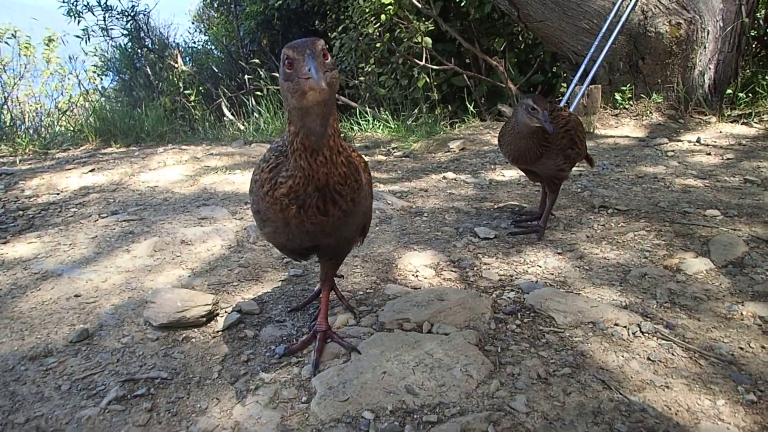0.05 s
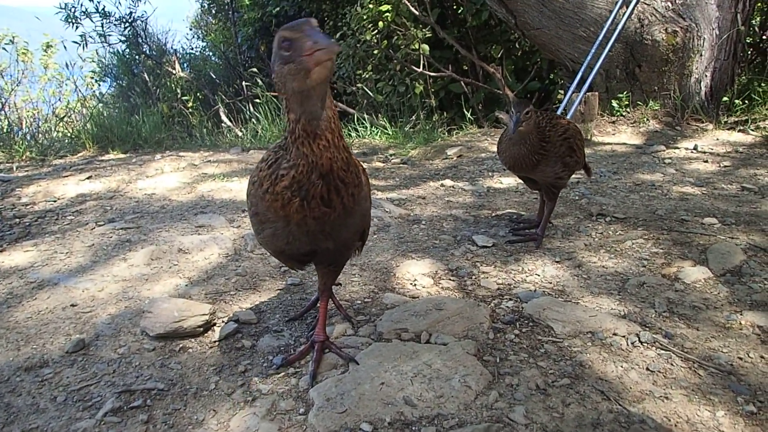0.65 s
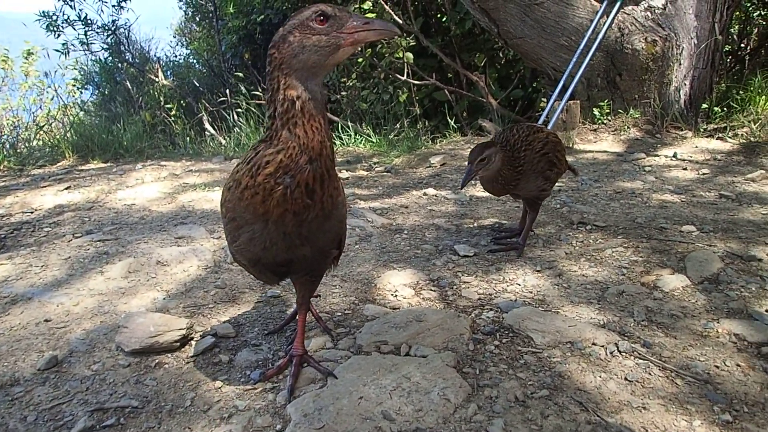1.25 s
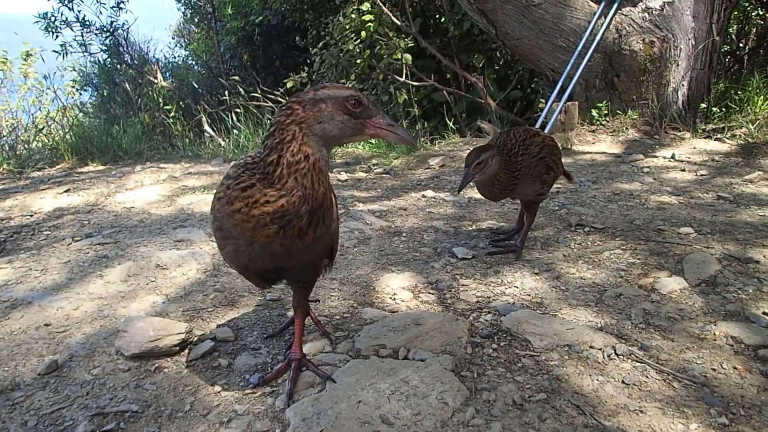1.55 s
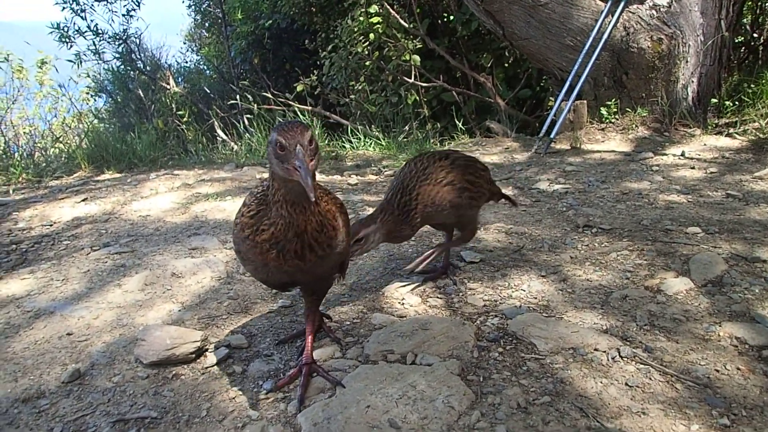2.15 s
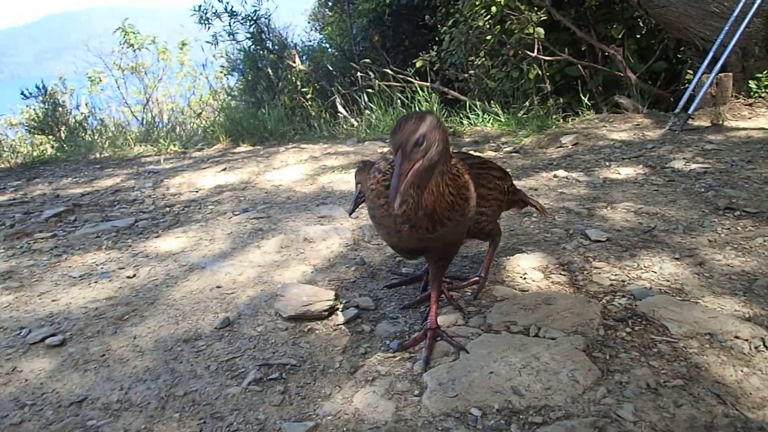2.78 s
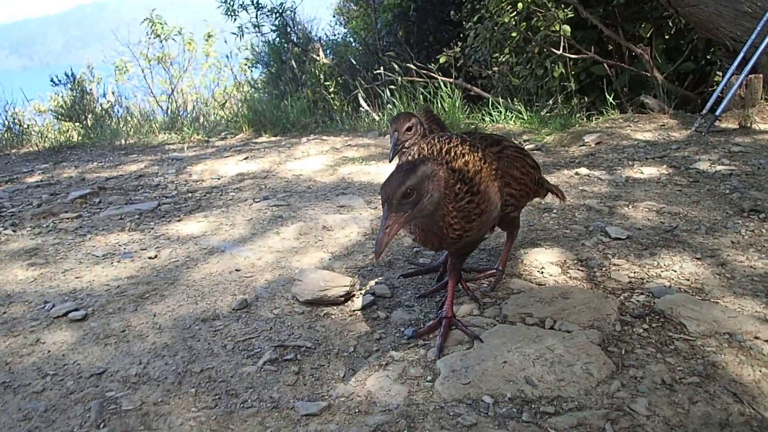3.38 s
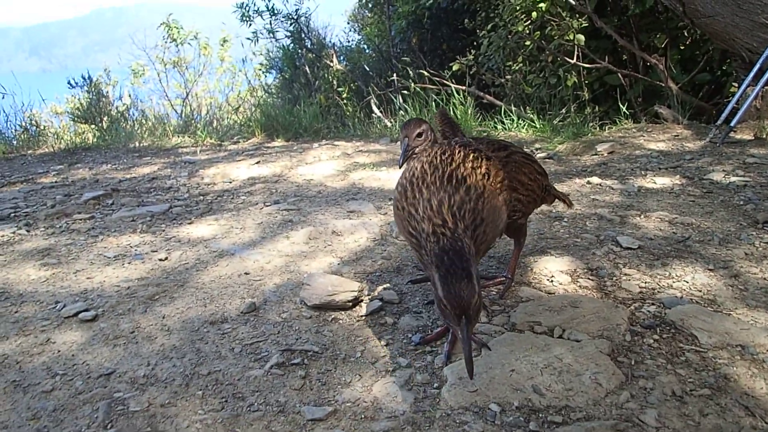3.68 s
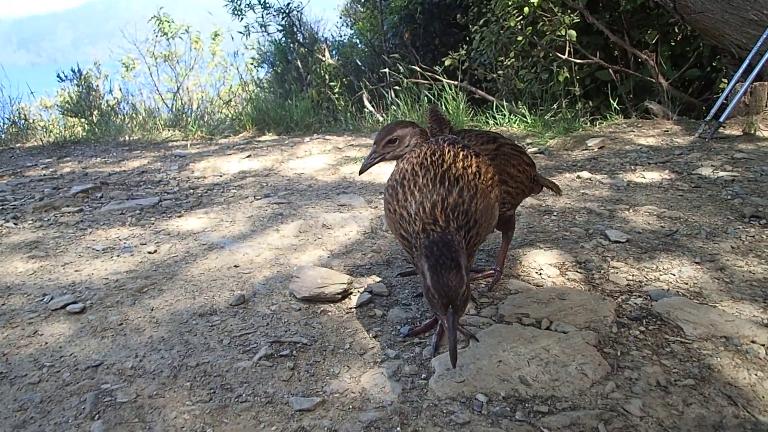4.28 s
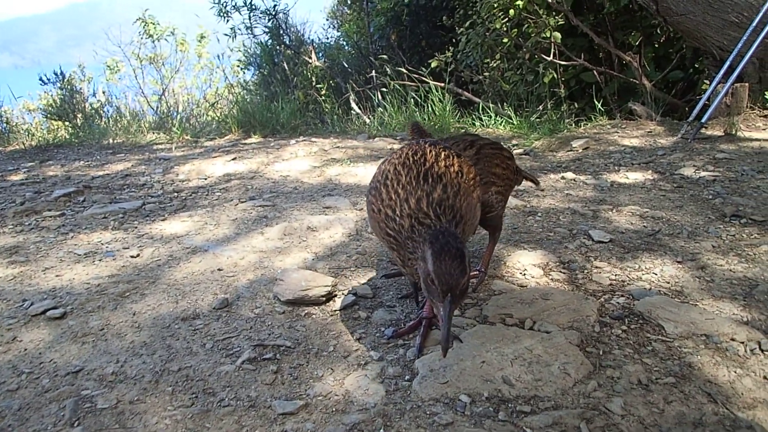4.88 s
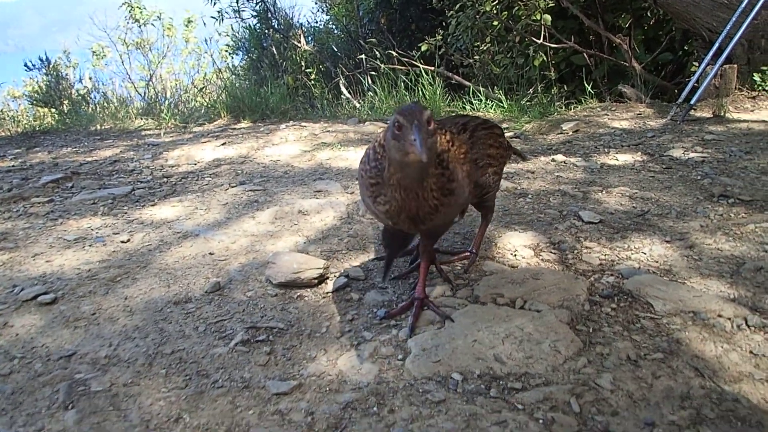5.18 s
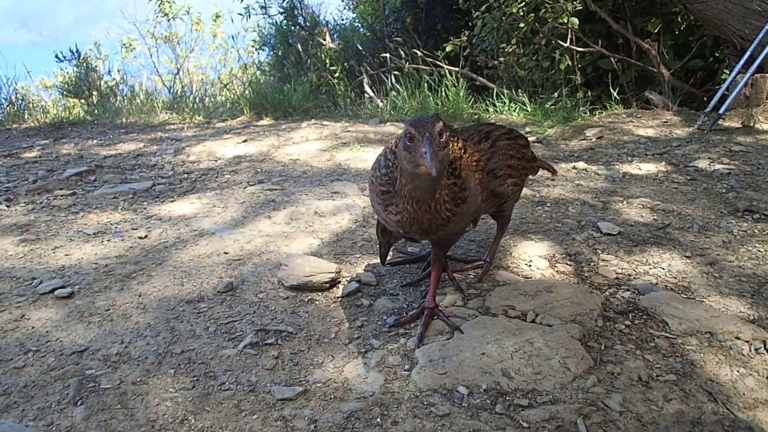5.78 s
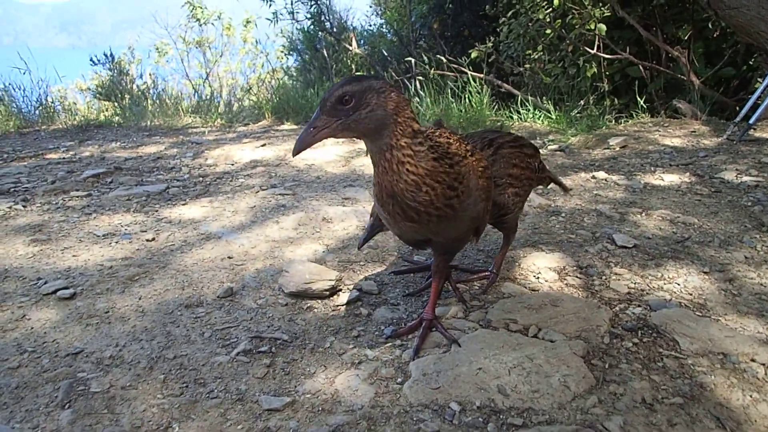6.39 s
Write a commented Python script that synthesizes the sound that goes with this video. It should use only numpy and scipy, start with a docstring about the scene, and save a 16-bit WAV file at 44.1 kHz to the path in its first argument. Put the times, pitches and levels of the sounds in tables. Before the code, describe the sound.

Birds peck stony ground close by with sharp, gritty taps while a small songbird warbles high and fast in the bushes.

```python
"""Stony ground beside bushes, in the open air. Two ground birds forage right by the microphone.
Each sharp tap is a dull thump with a burst of cracking grit; lighter clicks, pats and scuffs fall
between. Behind them a small songbird warbles in the bushes, a two-voiced whistle swinging up and down.
A far bird whistles faintly over a soft hush, and a light breeze rumbles on the microphone."""
import sys
import numpy as np
from scipy import signal
from scipy.fft import rfft, irfft
from scipy.io import wavfile
from scipy.ndimage import uniform_filter1d

SR = 44100
rng = np.random.default_rng(int(sys.argv[2]) if len(sys.argv) > 2 else 0)


def dump_mix(stems):
    """Bounce the given channels to the path in sys.argv[1] as a 16-bit WAV at rate SR."""
    frames = np.atleast_2d(stems).T  # one column per channel
    limited = np.clip(frames, -1, 1)  # hard clip at full scale
    pcm = np.round(limited * 32767).astype(np.int16)
    wavfile.write(sys.argv[1], SR, pcm)


N = 292824
TIME = np.arange(N) / SR
HZ = np.fft.rfftfreq(N, 1 / SR)

# Close taps, graze and last knock relative to the main crack: start_s, knock_db, knock_hz, snap_db,
# graze_db, rebound_hz, rebound_gap_s, rebound_fall_db_per_s, last_delay_s, last_db
TAPS = [(0.4404, -15.5, 1610, -20, -40, 762, .0047, 332, 0.07, -9),
        (1.3375, -17, 1575, -19, -30, 720, 0.0038, 280, 0.075, -26),
        (2.201, -15, 1135, -14, -34, 954, 0.0054, 567, 0.058, -20.5),
        (2.842, -17.5, 1270, -16.5, -3, 2240, .0029, 802, 0.074, -12),
        (3.8233, -21.5, 2160, -17, -30, 2110, .005, 406, 0.068, -7.5),
        (5.028, -19, 1057, -20.5, 1, 830, 0.0071, 1000, .0395, -14),
        (5.619, -16, 1144, -14, -10.5, 935, 0.0054, 634, 0.025, -36),
        (6.6235, -16, 1198, -15, -16.5, 1150, .0043, 650, .05, -11)]
# Dull thumps, one under each tap plus two lone low bumps, judder relative to the thump:
# peak_s, level_db, pitch_hz, judder_db
DULL_THUMPS = [(0.4409, -19, 204, -9), (1.3359, -19, 224, -4), (2.2004, -21, 216, -5),
               (2.8425, -19, 210, -10), (3.8215, -18.5, 212, -4), (5.0288, -22, 219, -4),
               (5.6194, -22, 191, -5), (6.2944, -25, 104, -25), (6.333, -20, 95, -35),
               (6.6239, -21, 196, -12)]
# Feet scuffing the soil, and at 6.155 s a rustle of feathers: start_s, length_s, level_db
SCUFFS = [(0.45, 0.02, -29), (1.327, 0.073, -37), (2.189, 0.11, -46), (2.778, 0.061, -47),
          (2.838, 0.077, -44.5), (3.312, 0.022, -50), (3.814, 0.044, -29), (4.366, 0.045, -44.5),
          (5.025, 0.11, -40), (5.266, 0.033, -41), (5.625, 0.059, -59), (5.674, 0.025, -44),
          (5.911, 0.1, -52), (6.155, 0.051, -47.5)]
# Light contacts: start_s, level_db
STONE_CLICKS = [(3.1078, -20.5), (3.181, -21), (3.184, -23.5), (3.966, -28.5), (4.129, -40.5), (4.801, -40),
                (5.394, -35.5), (5.8755, -40.5), (5.8944, -27), (5.915, -34.5), (5.958, -40.5)]  # claws and bills on stone
TOE_PATS = [(2.776, -36), (3.077, -35.5), (3.0882, -37), (3.0985, -39), (3.11, -31), (3.124, -37),
            (3.186, -32), (3.273, -46), (3.364, -41.5), (4.934, -58), (4.966, -53), (5.276, -41),
            (5.929, -39), (5.956, -36), (5.97, -40), (6.133, -35.5), (6.151, -33.5)]  # soft footfalls
# Spectra of the close ground sounds: frequency_hz, gain_db
KNOCK_SPECTRUM = [(100, -7), (300, -7), (480, -16.5), (750, 2), (1100, 8), (1600, 1), (2300, -5),
                  (3100, -2.5), (3800, -19), (5000, -17), (9000, -66)]
SNAP_SPECTRUM = [(2500, -87), (3800, -42), (4600, -4.5), (5300, 2), (6300, -1), (7200, -7), (8200, -7),
                 (9500, -19), (12000, -30), (16000, -27)]
JUDDER_SPECTRUM = [(50, -36), (110, -17.5), (160, 2.5), (230, 4), (300, -4.5), (450, -18.5), (900, -56.5)]
GRIT_SPECTRUM = [(80, 8), (250, -2.5), (600, 1.5), (1200, -2), (2300, -12), (3700, -15.5), (5400, -2.5),
                 (8000, -6.5), (10000, -40), (16000, -63)]
CLAW_SPECTRUM = [(100, -10), (400, -9.5), (900, -9.5), (1600, -12), (2800, -14), (3700, -7.5), (4600, 2),
                 (5400, -0.5), (7500, -6), (9500, -18.5), (16000, -51)]
TOE_SPECTRUM = [(40, -15), (100, 5), (220, 0), (450, -6), (800, -13), (1500, -38), (3000, -28)]

# Song in the bushes, one swing up and down a row: start_s, rise_s, fall_s, aimed_crest_hz,
# aimed_end_hz, drop_lateness (1 = even), rise_db, fall_db, accent_db
SONG_SYLLABLES = [(0.007, 0.0083, 0.031, 5450, 4700, 0.48, -46, -32, 6),
                  (0.038, 0.018, 0.029, 6580, 3960, 0.89, -35, -35, -0.5),
                  (0.129, 0.02, 0.068, 6860, 3940, 1.15, -43.5, -48, 0),
                  (0.234, 0.028, 0.049, 7330, 4760, 0.68, -28.5, -27, -3.5),
                  (0.312, 0.0264, 0.045, 7100, 5472, 0.6, -25.5, -21.5, -20),
                  (0.392, 0.027, 0.054, 6770, 4050, 0.82, -27.5, -18.5, -3),
                  (0.474, 0.038, 0.05, 6900, 3960, 0.79, -26.5, -21, -8.5),
                  (0.558, 0.042, 0.055, 6830, 3980, 1.1, -26, -22.5, -10),
                  (0.658, 0.051, 0.05, 7040, 3942, 0.76, -28, -21.5, -8.5),
                  (0.768, 0.043, 0.047, 6940, 4030, 0.92, -30, -22.5, -5.5),
                  (0.866, 0.043, 0.045, 6680, 3930, 0.92, -28, -20.5, -12),
                  (0.979, 0.027, 0.04, 7000, 3906, 1.0, -25.5, -25.5, 2.5),
                  (1.441, 0.0025, 0.026, 4940, 4670, 1.345, -31, -25, -2.5),
                  (1.466, 0.025, 0.026, 5520, 3922, 1.4, -27, -37, 5),
                  (1.559, 0.02, 0.053, 7160, 4430, 0.83, -32, -34, 5),
                  (1.634, 0.016, 0.063, 6880, 4062, 1.6, -26.5, -29, 3.5),
                  (1.711, 0.043, 0.044, 7580, 5130, 0.9, -30.5, -23, -8),
                  (1.803, 0.019, 0.058, 7000, 4466, 1.4, -25, -25, -0.5),
                  (1.88, 0.027, 0.046, 6970, 6213, 0.61, -22, -19.5, -1),
                  (1.959, 0.029, 0.044, 7150, 4662, 0.83, -26, -25, -4),
                  (2.034, 0.013, 0.051, 6040, 5470, 1.54, -22, -22.5, -3),
                  (2.113, 0.016, 0.044, 5860, 4782, 0.93, -30, -29.5, 8.5),
                  (2.174, 0.037, 0.045, 5590, 4105, 2.1, -38, -29.5, 6.5),
                  (2.279, 0.025, 0.029, 7000, 4130, 0.6, -27, -26, 8),
                  (2.363, 0.024, 0.022, 6710, 4060, 0.72, -31, -23, 9),
                  (2.446, 0.019, 0.032, 6560, 3763, 0.52, -29, -22.5, 1.5),
                  (2.53, 0.02293, 0.029, 7450, 3790, 0.8, -25, -20.5, -6),
                  (2.646, 0.017, 0.041, 5920, 3785, 0.86, -25, -28, 6.5),
                  (2.733, 0.022, 0.031, 7280, 3924, 0.7, -24.5, -23, -2.5),
                  (3.151, 0.003, 0.021, 5900, 5430, 0.954, -37, -30, -1),
                  (3.175, 0.025, 0.041, 6100, 3950, 1.55, -29, -45, 7),
                  (3.271, 0.015, 0.053, 7550, 5707, 0.59, -29.5, -32, 7),
                  (3.337, 0.024, 0.06, 6380, 4557, 2.1, -38.5, -37.5, 2.5),
                  (3.421, 0.029, 0.047, 7400, 5326, 0.5, -26.5, -29, -3),
                  (3.502, 0.023, 0.054, 7520, 4280, 0.5, -29, -31.5, 8.5),
                  (3.57, 0.045, 0.044, 7450, 4584, 0.58, -23, -33.5, 5),
                  (3.657, 0.046, 0.038, 7270, 3947, 0.74, -28.5, -24.5, 2),
                  (3.762, 0.028, 0.038, 7690, 3994, 0.84, -23.5, -29.5, 4),
                  (3.867, 0.025, 0.043, 7580, 3830, 0.5, -27, -24, 4),
                  (3.958, 0.026, 0.034, 7530, 3827, 1.07, -26, -28.5, 2.5),
                  (4.482, 0.00714, 0.02, 6080, 4845, 0.66, -35, -24.5, 2),
                  (4.509, 0.0298, 0.035, 6240, 3988, 1.3, -29, -50.5, 9),
                  (4.605, 0.017, 0.05, 7430, 5770, 0.8, -30, -36.5, 10),
                  (4.683, 0.024, 0.03, 7000, 5420, 0.93, -36, -27.5, 12),
                  (4.736, 0.053, 0.021, 7180, 5273, 0.83, -45.5, -25, 14),
                  (4.81, 0.031, 0.053, 7450, 5310, 0.9, -37, -32.5, 15.5),
                  (4.902, 0.034, 0.043, 7400, 5044, 0.45, -23.5, -18.5, -1.5),
                  (4.978, 0.028, 0.042, 7300, 3930, 0.7, -26, -30.5, -1),
                  (5.067, 0.028, 0.041, 7540, 3915, 1.2, -25, -24.5, -5),
                  (5.162, 0.025, 0.036, 7700, 3940, 1.03, -22.5, -19, -6.5),
                  (5.255, 0.028, 0.032, 7600, 3904, 0.72, -24, -22.5, -1.5),
                  (5.343, 0.028, 0.032, 7230, 3890, 0.9, -26.5, -21.5, 4),
                  (5.432, 0.026, 0.031, 6800, 3970, 1.5, -26.5, -24, 7),
                  (5.537, 0.016, 0.035, 6860, 4005, 2.4, -27.5, -21, 8.5),
                  (6.025, 0.00253, 0.03, 6630, 5040, 1, -36, -37, 1),
                  (6.058, 0.021, 0.038, 6060, 3950, 0.98, -34.5, -51.5, 2),
                  (6.155, 0.0068, 0.05, 6800, 5810, 2.4, -35.5, -33, -4),
                  (6.221, 0.029, 0.053, 7180, 5390, 2.2, -41, -26.5, -7),
                  (6.314, 0.03, 0.04, 6500, 3994, 1.3, -29, -25.5, -3),
                  (6.4, 0.035, 0.031, 6740, 4034, 1.2, -25.5, -23, -7.5),
                  (6.496, 0.019, 0.037, 6610, 3985, 1.1, -29.5, -21, -9.5),
                  (6.583, 0.023, 0.032, 6800, 3980, 2.2, -28, -21, -19)]
# The song sounds loudest near 5 kHz, fainter on low and high notes: pitch_hz, gain_db
LEVEL_BY_PITCH = [(3700, -14.5), (4100, -14.5), (4500, -3.5), (5100, 1.9), (5600, 0), (6000, -1.6),
                  (6500, -8), (7200, -8.5)]
# Strength of the song's other tones against its fundamental: pitch_hz, gain_db
SECOND_VOICE_LEVEL = [(4600, -9), (5400, -20), (6000, -7.5), (7000, -10)]  # just above the first voice
OCTAVE_LEVEL = [(3900, 2), (4300, -16.5), (4900, -27), (5600, -22), (6300, -24), (7200, -18)]  # grows on low notes
# Notes of the distant bird: start_s, length_s, pitch_hz, level_db
FAR_NOTES = [(5.36, 0.081, 1800, -60), (6.102, 0.2, 1758, -63.5), (6.361, 0.16, 1738, -61.5)]

# Breeze on the microphone: time_s, level_db
GUSTS = [(0.0, -62), (1.14, -70), (1.33, -39.5), (1.48, -60), (4.84, -55.5), (4.94, -37), (5.38, -58.5),
         (5.97, -37.5), (6.19, -51), (6.31, -41), (6.51, -59), (6.64, -61)]
# Midrange swells in the hush: start_s, length_s, level_db
HUSH_SWELLS = [(0.135, 0.27, -49.5), (0.699, .2, -50), (1.85, 0.25, -51.5), (2.48, .18, -50.5)]
# Spectra of the background: frequency_hz, gain_db
RUMBLE_SPECTRUM = [(20, -19.5), (45, -5.5), (75, -5.5), (120, -11.5), (200, -22), (500, -47)]
HUSH_SPECTRUM = [(30, -16.5), (70, -8.5), (200, -10), (400, -12), (800, -17), (1350, -19), (2000, -28.5),
                 (3700, -35.5), (4500, -29), (5400, -22), (8000, -20.5), (9500, -27), (12300, -20),
                 (16000, -26.5)]
SWELL_SPECTRUM = [(200, -4), (500, -5.5), (1150, 0), (1800, -11), (2800, -15), (4000, -14), (8000, -38)]
# How alike the hush is on the left and right: frequency_hz, correlation
HUSH_LIKENESS = [(60, 0.66), (250, 0.4), (1400, 0.15), (3100, 0.67), (6000, 0.037), (15000, 0.22)]
# Balance of the microphone's two sides: frequency_hz, left_minus_right_db
MIC_BALANCE = [(60, 3.5), (300, 3), (2000, 2), (4500, 2.5), (8000, -0.5), (15000, 2)]


def taps(uneven_db=1.5, uneven_pitch=0.09, uneven_gap=0.1, rebounds=7, last_knock_hz=970):
    """Right by the microphone, each tap grazes, cracks, chatters in fading rebounds and knocks last."""
    out = np.zeros(N)
    graze_lead_s, rebound_knock_db, rebound_snap_db, last_snap_db = 0.0034, -3, -4, -6
    for s, knock_db, hz, snap_db, graze_db, rebound_hz, gap_s, fall_db_per_s, last_s, last_db in TAPS:
        add(out, s - graze_lead_s, grit_crack(knock_db + graze_db, hz, snap_db + graze_db))
        add(out, s, grit_crack(knock_db, hz, snap_db))
        jitter = rng.uniform(-1, 1, (rebounds, 4)) * np.sqrt(3)
        for k, (time_jitter, knock_jitter, pitch_jitter, snap_jitter) in enumerate(jitter, 1):
            after_s = gap_s * (k + uneven_gap * time_jitter)
            fall_db = fall_db_per_s * after_s
            knock = knock_db + rebound_knock_db - fall_db + uneven_db * knock_jitter
            snap = snap_db + rebound_snap_db - fall_db + uneven_db * snap_jitter
            add(out, s + after_s, grit_crack(knock, rebound_hz * np.exp(uneven_pitch * pitch_jitter), snap))
        last = grit_crack(knock_db + last_db, last_knock_hz, snap_db + last_db + last_snap_db)
        add(out, s + last_s, last)
    return out


def grit_crack(knock_db, knock_hz, snap_db):
    """One crack knocks the ground with its own hollow pitch and snaps brightly."""
    knock = crack(KNOCK_SPECTRUM, crush_s=0.0012, crush=0.2, ring_s=0.005, ring=0.025)
    snap = crack(SNAP_SPECTRUM, crush_s=0.00044, crush=0.52, ring_s=0.0047, ring=0.043)
    body = gain_of(-4) * knock + gain_of(-5.5) * hollow(knock_hz, t60=0.025)
    return gain_of(knock_db) * body + gain_of(snap_db - 0.5) * snap


def crack(spectrum, crush_s, crush, ring_s, ring):
    """One grain gives way: a sharp impulse, a moment of crushing and a weak ring."""
    t = np.arange(SR // 25) / SR
    force = rng.standard_normal(len(t)) * (crush * np.exp(-t / crush_s) + ring * np.exp(-t / ring_s))
    force[0] -= 1
    return unit_attack(coloured(force, spectrum))


def hollow(hz, t60):
    """Knocked ground rings briefly at one pitch."""
    t = np.arange(SR // 25) / SR
    return unit_attack(-np.sin(2 * np.pi * hz * t) * gain_of(-60 * t / t60))


def thumps(push_s=0.0033, judder_s=0.058):
    """Close, dull thumps and bumps: a push of about two swings, then a low judder as grit gives way."""
    out, t = np.zeros(N), np.arange(-SR // 40, SR // 8) / SR
    judder_onset = np.clip(t / push_s - 1, 0, 1)
    judder_decay = gain_of(-7 * ((t / judder_s) ** 2 + t / judder_s))
    for s, db, hz, judder_db in DULL_THUMPS:
        push = -np.cos(2 * np.pi * hz * t) * np.exp(-(t / push_s) ** 2 * hz / 400)
        shake = unit_rms(coloured(rng.standard_normal(len(t)), JUDDER_SPECTRUM))
        judder = gain_of(judder_db) * shake * judder_onset * judder_decay
        add(out, s + t[0], gain_of(db) * (push + judder))
    return out


def scuffs(grains_per_s=900):
    """Loose grit shifts underfoot, and once feathers rustle, in a shower of tiny grains."""
    out = np.zeros(N)
    for s, length_s, db in SCUFFS:
        chance, sign = rng.random((2, int(length_s * SR)))
        grains = (chance < grains_per_s / SR) * np.sign(sign - 0.5)
        shower = unit_rms(coloured(grains, GRIT_SPECTRUM))
        add(out, s, gain_of(db) * shower * signal.windows.tukey(len(shower), 0.5))
    return out


def clicks_and_pats():
    """Close by, claws and bills click on stone and toes pat the soil."""
    out = np.zeros(N)
    for s, db in STONE_CLICKS:
        click = crack(CLAW_SPECTRUM, crush_s=0.0013, crush=0.31, ring_s=0.0032, ring=0.02)
        add(out, s, gain_of(db) * click)
    for s, db in TOE_PATS:
        pat = crack(TOE_SPECTRUM, crush_s=0.0053, crush=0.12, ring_s=0.0076, ring=0.023)
        add(out, s, gain_of(db) * pat)
    return out


def songbird(waver=0.0085, flutter_db=2.5, rasp_rising=0.056, rasp_falling=0.022,
             second_above_hz=550, second_falling_db=-9):
    """In the bushes, a two-voiced whistle swings about eleven times a second, raspier on the way up."""
    pitch, loudness = melody()
    phase = 2 * np.pi * np.cumsum(pitch * (1 + waver * wander(hz=159))) / SR
    rising = uniform_filter1d((np.gradient(pitch) > 0) * 1., size=400)
    level = loudness * gain_of(flutter_db * wander(hz=165))
    rasp_depth = rasp_falling + (rasp_rising - rasp_falling) * rising
    rasp = rasp_depth * (wander(hz=650) * np.sin(phase) + wander(hz=650) * np.cos(phase)) / np.sqrt(2)
    beat_phase = 2 * np.pi * np.cumsum(second_above_hz * (1 + 0.28 * wander(hz=39.4))) / SR
    second_db = lookup(SECOND_VOICE_LEVEL, pitch) + second_falling_db * (1 - rising)
    second_voice = gain_of(second_db) * np.sin(phase + beat_phase)
    octave_db = lookup(OCTAVE_LEVEL, pitch) + 3 * wander(hz=61)
    overtones = gain_of(octave_db) * (np.sin(2 * phase) + gain_of(-14) * np.sin(3 * phase))
    voice = np.sqrt(2) * level * (np.sin(phase) + second_voice + rasp + overtones)
    # echoes from nearby ground beat against the gliding note; the bushes add a faint tail
    ground = gain_of(-10.5) * scatter(voice, t60=0.041, delay_s=0.003, likeness=0.51)
    bushes = gain_of(-23.5) * scatter(voice, t60=0.17, delay_s=0.032, likeness=0.19)
    return gain_of(-2) * placed(voice, lag_ms=0.014, left_db=-2) + ground + bushes


def melody(onset_hz=5100., slur_s=0.008, attack_s=0.0016, release_s=0.011, curl_hz=219.9, curl_s=0.032):
    """Pitch and loudness of the song: each syllable swings to its crest, drops and dies away."""
    hz, gate, accent = np.full(N, onset_hz), np.zeros(N), np.zeros(N)
    efforts, last_end = [], -1
    for start, rise, fall, crest_hz, end_hz, lateness, rise_db, fall_db, accent_db in SONG_SYLLABLES:
        at = max(round(start * SR), 1)
        t = TIME[:min(SR // 4, N - at)]
        span = slice(at, at + len(t))
        slurred = start - last_end < slur_s
        from_hz = hz[at - 1] if slurred else onset_hz
        climb = (crest_hz - from_hz) * ease(t / rise, lateness=1.27)
        drop = (end_hz - crest_hz) * ease((t - rise) / fall, lateness)
        curl = curl_hz * ease((t - rise - fall) / curl_s, lateness=1.8)  # a dying note curls back up
        hz[span] = from_hz + climb + drop + curl
        attack = 1 if slurred else ease(t / attack_s, lateness=1)
        gate[span] = attack * np.exp(-np.maximum(t - rise - fall, 0) / release_s)
        accent[span] = accent_db * (t > rise)
        efforts += [(start + rise / 2, rise_db), (start + rise + fall / 2, fall_db)]
        last_end = start + rise + fall
    hz = bend(hz, centre_hz=5984, width_hz=1770, push=-0.52)  # glides linger near the easiest pitch
    hz = bend(hz, centre_hz=4440, width_hz=370, push=1.29)  # and rush through a break in the voice
    flare_db = accent * np.exp(-((hz - 5100) / 580) ** 2)  # the accent acts on the fall through 5100 Hz
    effort_db = np.interp(TIME, *np.transpose(efforts))
    pitch_gain_db = uniform_filter1d(flare_db + lookup(LEVEL_BY_PITCH, hz), size=100)
    return hz, uniform_filter1d(gate, size=30) * gain_of(effort_db + pitch_gain_db)


def far_bird():
    """Far off, faint level whistles, soft at both ends, trail away in echoes."""
    out = np.zeros(N)
    for s, length_s, hz, db in FAR_NOTES:
        t = np.arange(int(length_s * SR)) / SR
        add(out, s, gain_of(db) * np.sin(2 * np.pi * hz * t) * signal.windows.tukey(len(t), 0.4))
    return out + gain_of(-2) * scatter(out, t60=0.68, delay_s=0.01, likeness=0.3)


def breeze():
    """Light gusts buffet each side of the microphone with a low rumble."""
    return gain_of(np.interp(TIME, *np.transpose(GUSTS))) * stereo_noise(RUMBLE_SPECTRUM, likeness=0.28)


def hush():
    """All around, a steady hush whose midrange swells softly now and then."""
    steady = gain_of(-48.5) * stereo_noise(HUSH_SPECTRUM, lookup(HUSH_LIKENESS, HZ))
    swell = np.zeros(N)
    for s, length_s, db in HUSH_SWELLS:
        add(swell, s, gain_of(db) * signal.windows.hann(int(length_s * SR)))
    return steady + swell * stereo_noise(SWELL_SPECTRUM, likeness=0.92)


def placed(x, lag_ms, left_db):
    """Direction at the microphone: the left side's delay and level against the right."""
    left = irfft(rfft(x) * np.exp(-2j * np.pi * HZ * lag_ms / 1000), N)
    return np.array([left * gain_of(left_db / 2), x * gain_of(-left_db / 2)])


def scatter(x, t60, delay_s, likeness):
    """Sparse echoes from ground and foliage, partly shared by the channels."""
    t = np.arange(SR // 2) / SR
    echoes = rng.standard_normal((3, len(t))) * (rng.random((3, len(t))) < 0.1)
    stereo = np.sqrt(likeness) * echoes[2] + np.sqrt(1 - likeness) * echoes[:2]
    tail = stereo * gain_of(-60 * t / t60) * (t > delay_s)
    return signal.fftconvolve(x[None], tail / np.linalg.norm(tail[0]), axes=1)[:, :N]


def stereo_noise(spectrum, likeness):
    """Steady noise of one colour, partly shared by the channels."""
    left, other = rfft(rng.standard_normal((2, N)))
    right = likeness * left + np.sqrt(1 - likeness ** 2) * other
    return unit_rms(irfft(np.array([left, right]) * gain_of(lookup(spectrum, HZ)), N))


def coloured(x, spectrum, size=2048):
    """Minimum-phase filter: nothing sounds before the blow."""
    log_gain = np.log(gain_of(lookup(spectrum, abs(np.fft.fftfreq(size, 1 / SR)))))
    ring = np.fft.ifft(np.exp(np.conj(signal.hilbert(log_gain)))).real
    return signal.fftconvolve(x, ring[:size // 2])[:len(x)]


def wander(hz):
    """Random motion up to the given rate; rms 1."""
    return unit_rms(irfft(rfft(rng.standard_normal(N)) / (1 + (HZ / hz) ** 4), N))


def bend(hz, centre_hz, width_hz, push):
    """Pushes nearby pitches away from a centre; a negative push draws them in."""
    return hz + push * (hz - centre_hz) * np.exp(-((hz - centre_hz) / width_hz) ** 2)


def ease(share, lateness):
    """A smooth step from 0 to 1; lateness over 1 puts it off."""
    return (1 - np.cos(np.pi * np.clip(share, 0, 1) ** lateness)) / 2


def gain_of(db):
    """Decibels to gain."""
    return 10 ** (np.asarray(db) / 20)


def unit_rms(x):
    """Scales to rms 1."""
    return x / np.sqrt(np.mean(x ** 2) + 1e-20)


def unit_attack(x):
    """Scales to rms 1 over the first 3 ms."""
    return x / np.sqrt(np.mean(x[:SR * 3 // 1000] ** 2))


def lookup(table, hz):
    """Reads a table on a log-frequency axis."""
    table_hz, value = np.transpose(table)
    return np.interp(np.log(hz + 1), np.log(table_hz + 1), value)


def add(mix, s, sound):
    """Adds a sound at time s."""
    part = mix[max(round(s * SR), 0):][:len(sound)]
    part += sound[:len(part)]


def scene():
    """Close, nearly dry foraging in front; song, far bird and open air behind."""
    grit = taps() + scuffs() + clicks_and_pats()
    direct = placed(grit + thumps(), lag_ms=0.015, left_db=-0.95)
    echoes = gain_of(-14.5) * scatter(grit, t60=0.12, delay_s=0.00033, likeness=0.19)
    return direct + echoes + songbird() + far_bird() + breeze() + hush()


def record(dry, band_limit_hz=16100):
    """The microphone's left side is a little louder, most in the bass; then clipping and a low-pass."""
    tilt_db = lookup(MIC_BALANCE, HZ) / 2
    heard = np.clip(irfft(rfft(dry) * gain_of([tilt_db, -tilt_db]), N), -1, 1)
    low_pass = signal.firwin(255, band_limit_hz, window=("kaiser", 9), fs=SR)
    return signal.oaconvolve(heard, low_pass[None], "same")


dry = scene()
out = record(dry)
dump_mix(out)
```